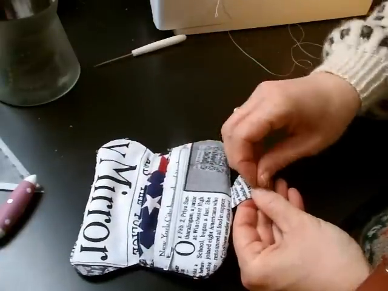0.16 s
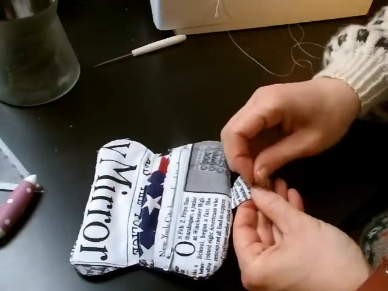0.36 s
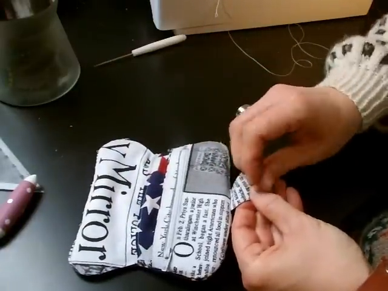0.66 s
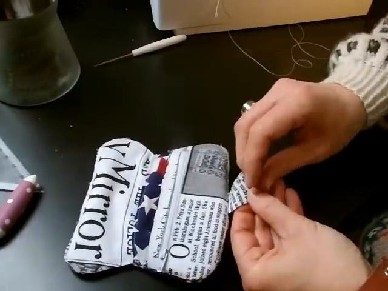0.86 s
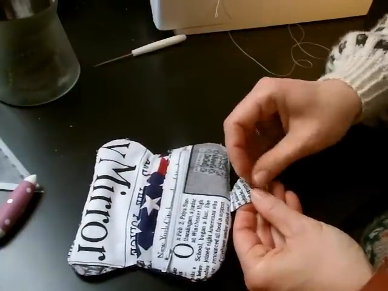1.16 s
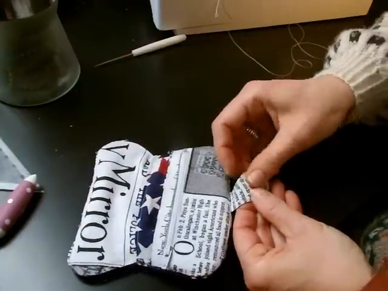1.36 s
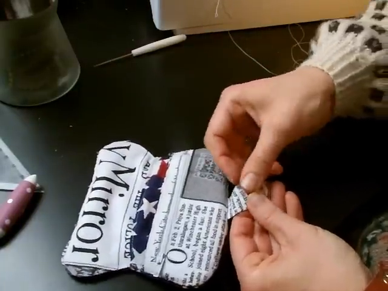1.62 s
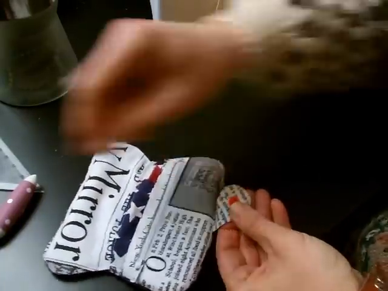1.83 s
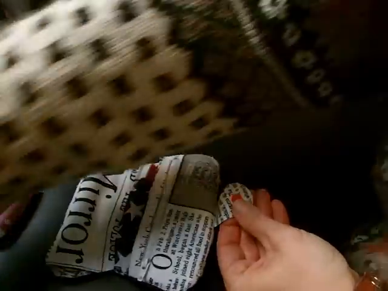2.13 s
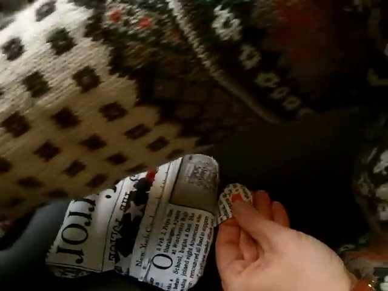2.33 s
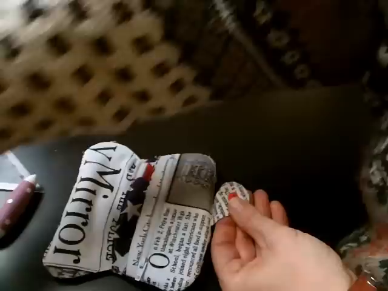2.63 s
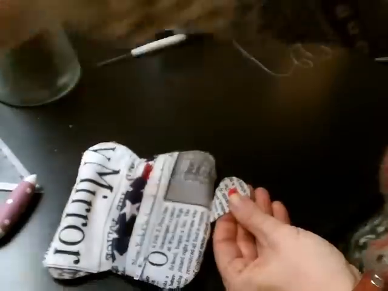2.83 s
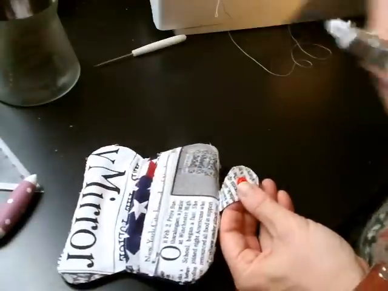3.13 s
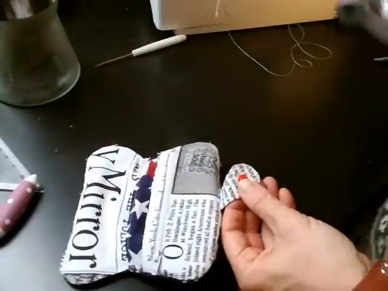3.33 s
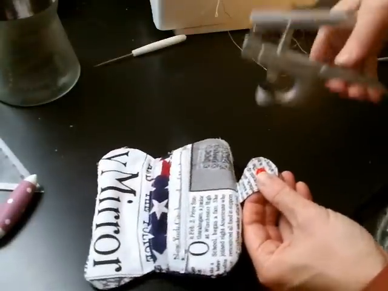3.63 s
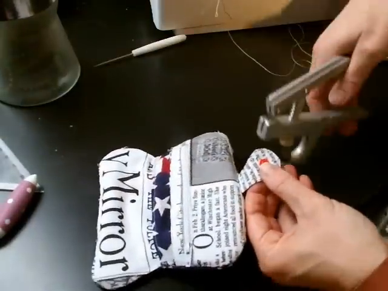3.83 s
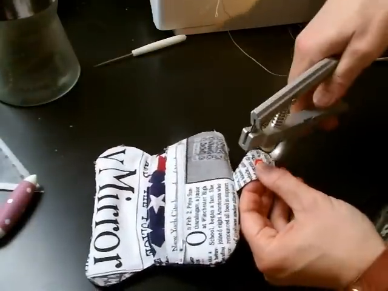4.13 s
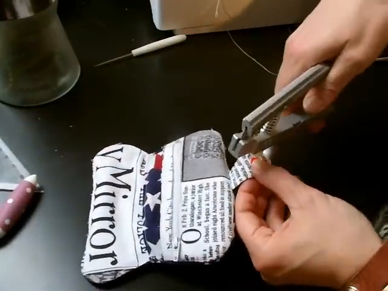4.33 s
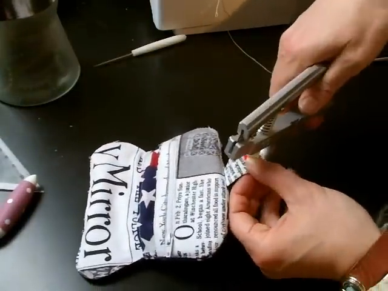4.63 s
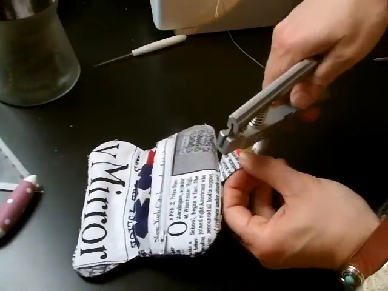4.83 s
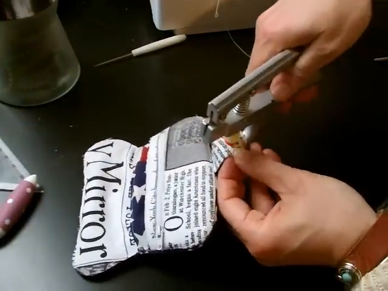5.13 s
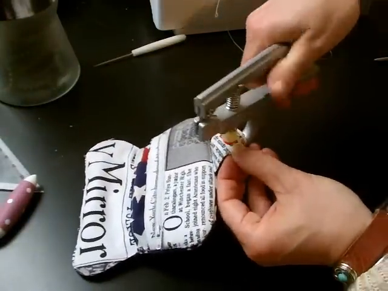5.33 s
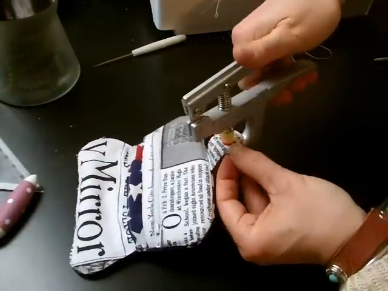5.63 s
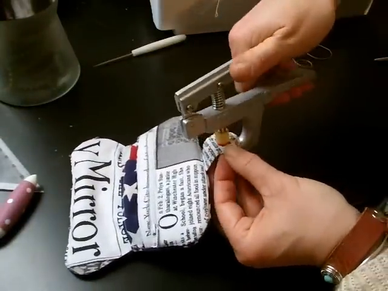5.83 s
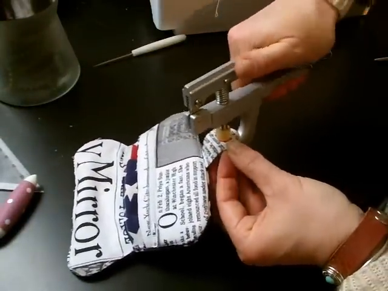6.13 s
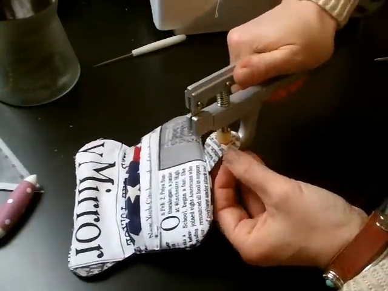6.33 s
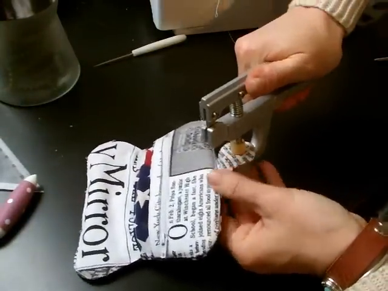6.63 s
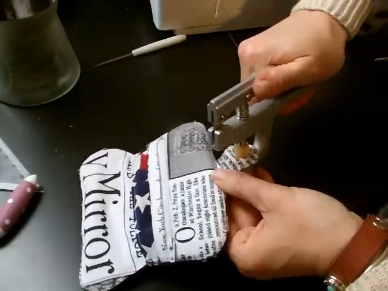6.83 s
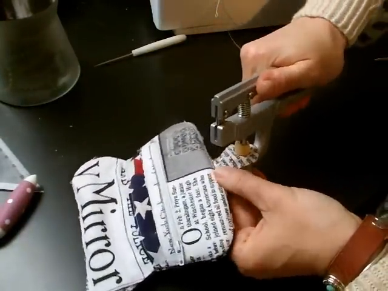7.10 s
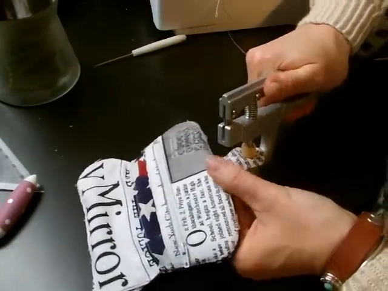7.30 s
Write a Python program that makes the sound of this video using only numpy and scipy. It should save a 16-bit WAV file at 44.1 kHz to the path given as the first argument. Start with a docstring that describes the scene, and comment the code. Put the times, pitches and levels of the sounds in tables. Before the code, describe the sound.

Wool sleeve rustles, metal pliers drag and knock over resonant wood, get lifted with sharp clatter, then small metallic clicks and taps follow quietly.

```python
"""A quiet room with a wooden sewing table, where hands are at work. An arm in a wool sleeve reaches across and
drags metal snap pliers over the table top: knocks and scrapes set the wood ringing. The pliers are lifted
with a clatter and set on a cloth tab with light clicks: bursts of noise and ringing metal. Small taps are
short rings with puffs of noise, and rustling cloth is fine noise. Faint thin cheeps are pure tones, and a
steady hiss of shaped noise lies under everything."""
import sys
import numpy as np
from scipy import signal
from scipy.fft import rfft, irfft
from scipy.io import wavfile

SR = 44100
rng = np.random.default_rng(int(sys.argv[2]) if len(sys.argv) > 2 else 0)


def persist_wave(psi):
    """Save psi, clipped to +-1, as 16-bit WAV."""
    counts = np.round(np.clip(psi, -1, 1) * 32767).astype(np.int16)
    wavfile.write(sys.argv[1], SR, np.atleast_2d(counts).T)


N = 328986


def from_db(db):
    """Turn a level in dB into a gain."""
    return 10 ** (np.asarray(db) / 20)


def rms_one(x):
    """Scale a sound to an average strength (rms) of 1."""
    return x / np.sqrt(np.mean(x ** 2) + 1e-20)


def in_time(rows, column):
    """Read one column of a curve in dB at every sample; -120 dB outside its span."""
    rows = np.array(rows)
    return np.interp(np.arange(N) / SR, rows[:, 0], rows[:, column], left=-120, right=-120)


def at_hz(points, hz):
    """Read a curve over frequency, with straight lines on a logarithmic frequency axis."""
    points = np.array(points)
    return np.interp(np.log(hz), np.log(points[:, 0]), points[:, 1])


def drift(rate_hz):
    """Slow random wandering with a spread of 1: noise smoothed twice, computed at every 40th sample."""
    r = np.exp(-80 * np.pi * rate_hz / SR)
    noise = rng.standard_normal(N // 40 + 2002)
    slow = signal.lfilter([1], [1, -2 * r, r * r], noise)[2000:]  # skip the filter's start
    return np.interp(np.arange(N) / 40, np.arange(len(slow)), rms_one(slow))


def ring(blows, hz, t60):
    """One way of ringing (a mode): a unit blow starts a sine of height 1 that falls 60 dB in t60 seconds."""
    r = from_db(-60 / (t60 * SR))
    w = 2 * np.pi * hz / SR
    return signal.lfilter([0, np.sin(w)], [1, -2 * r * np.cos(w), r * r], blows + 1e-18)


def filtered(x, order, hz, kind):
    """Butterworth filter: keep the low, high or middle part of a sound."""
    return signal.sosfilt(signal.butter(order, hz, kind, fs=SR, output="sos"), x)


def band(x, low_hz, high_hz):
    """Keep the frequencies between two limits."""
    return filtered(x, 2, [low_hz, high_hz], "band")


def impulses(times, gains):
    """One-sample blows of the given heights at the given times."""
    out = np.zeros(N)
    np.add.at(out, np.round(np.asarray(times) * SR).astype(int), gains)
    return out


def grains(per_s, spread_db):
    """Random tiny contacts of uneven size and sign; rms 1."""
    sizes = from_db(spread_db * np.minimum(rng.exponential(1, N), 4))
    signs = rng.choice([-1, 1], N)
    return rms_one(sizes * signs * (rng.random(N) < per_s / SR))


def coloured(source, spectrum):
    """Shape each row of a source to a spectrum; rms 1 over all rows."""
    hz = np.maximum(np.arange(N // 2 + 1) * SR / N, 1)
    return rms_one(irfft(rfft(source) * from_db(at_hz(spectrum, hz)), N))


def leaning(hz, centre_hz, octaves):
    """A blow drives modes near its centre pitch hardest: -6 dB at the given distance in octaves."""
    return -6.0 * (np.log2(hz / centre_hz) / octaves) ** 2


def swell(centre_s, length_s):
    """A smooth bell-shaped rise and fall with a height of 1."""
    return np.exp(-8 * ((np.arange(N) / SR - centre_s) / length_s) ** 2)


def sideways(x, spread_db, above_hz):
    """The treble above a given pitch spreads unevenly to left and right, smeared over about a millisecond."""
    t = np.arange(SR // 200) / SR
    smear = rms_one(rng.standard_normal(len(t)) * from_db(-60 * t / 0.0017)) / np.sqrt(len(t))
    treble = filtered(x, 2, above_hz, "high")
    # the small minus share makes the right louder
    side = from_db(spread_db) * signal.fftconvolve(treble, smear)[:N] - 0.023 * treble
    return x + side * [[1], [-1]]


def hiss():
    """Steady shaped noise; left and right are alike mainly in the deep bass and the treble."""
    # hiss colour: (frequency [Hz], relative level per Hz [dB])
    hiss_colour = [(25, -42), (45, -37), (75, -4), (120, -15), (300, -2), (600, 0.5), (1000, -2),
                   (2000, -0.5), (3500, -1), (8000, -6.5), (12000, -7), (15700, -4.5)]
    # how alike left and right are: (frequency [Hz], likeness [0 to 1])
    likeness = [(60, 0.81), (150, 0.19), (380, 0.13), (950, 0.25), (3500, 0.022), (5000, 0.82),
                (15000, 0.78)]
    level_db = -44
    hz = np.maximum(np.arange(N // 2 + 1) * SR / N, 1)
    alike = np.clip(at_hz(likeness, hz), 0, 1)
    mid, side = rfft(rng.standard_normal((2, N)))
    pair = irfft(np.sqrt(1 + alike) * mid + np.sqrt(1 - alike) * side * [[1], [-1]], N)
    return from_db(level_db + 0.2 * drift(2.9)) * coloured(pair, hiss_colour)


def cheeps():
    """Faint thin cheeps: short pure tones that swell and fade."""
    # cheeps: centre time [s]
    centres = [.535, 1.132, 1.372, 7.034, 7.27]
    level_db, pitch_hz, length_s = -49.5, 2880, 0.046
    tone = np.sin(2 * np.pi * pitch_hz * np.arange(N) / SR)
    return from_db(level_db) * tone * sum(swell(s, length_s) for s in centres)


def rustle():
    """Fibres catch and let go: dense fine grains for bright wool, smooth noise for dull cotton."""
    # arm motion, heard as the wool sleeve rubbing: (time [s], level [dB])
    arm_motion = [(0.0, -49.5), (1.25, -48), (1.81, -43), (2.3, -39), (2.78, -41), (3.05, -48),
                  (3.45, -46.5), (7.46, -47)]
    # brief brushes of cloth against cloth or metal: (centre time [s], length [s], level [dB])
    brushes = [(0.114, 0.076, -51), (0.705, 0.13, -53), (1.287, 0.13, -49), (1.475, .06, -48),
               (1.73, .045, -50), (2.912, 0.1, -43), (3.01, 0.11, -40.5), (3.214, 0.2, -36),
               (3.378, 0.057, -48), (5.106, 0.071, -41), (5.33, .05, -51), (5.586, 0.049, -44)]
    # wool colour: (frequency [Hz], relative level per Hz [dB])
    wool_colour = [(2500, -11.5), (4000, -9), (6500, -6.5), (8200, -3.5), (9500, -2), (10800, -3.5),
                   (12500, -7), (15700, -7.5)]
    # cotton colour: (frequency [Hz], relative level per Hz [dB])
    cotton_colour = [(200, -21), (500, -0.5), (1200, 2), (2500, -2.5), (4500, -22.5)]
    cotton_rest_db, cotton_follows = -51.5, 0.41  # cotton pouch: level at rest, share of the arm's swing
    arm_db = in_time(arm_motion, 1)
    rubbing = from_db(arm_db) + sum(from_db(db) * swell(s, length) for s, length, db in brushes)
    wool = coloured(grains(per_s=14000, spread_db=1.5), wool_colour) * rubbing * from_db(1.2 * drift(23))
    cotton_db = cotton_rest_db + cotton_follows * (arm_db - arm_db[-1])
    cotton = coloured(rng.standard_normal((2, N)), cotton_colour) * from_db(cotton_db + 2.1 * drift(29))
    return sideways(wool, spread_db=-30, above_hz=1800) + cotton


def taps():
    """Each tap or thud is a brief ring at its pitch with a dying puff of noise around it."""
    # small dull taps of studs, nails and jaws: (time [s], relative level [dB], pitch [Hz])
    small_taps = [(0.115, -43.5, 2790), (0.249, -41.5, 2210), (0.709, -44, 1680), (0.884, -39.5, 2480),
                  (1.018, -37.5, 2410), (1.123, -46, 2780), (1.28, -40.5, 1370), (1.784, -35, 2350),
                  (1.918, -36.5, 2400), (2.998, -41, 2660), (3.719, -45, 2720), (3.853, -47, 2110),
                  (4.0833, -31.5, 1350), (4.381, -35, 1550), (4.453, -41, 2690), (4.686, -37.5, 1400),
                  (4.858, -45, 1340), (5.089, -38.5, 3000), (5.121, -37, 2630), (5.321, -42.5, 2000),
                  (5.953, -41, 2680), (6.154, -45, 1920), (6.755, -43.5, 2720), (6.889, -44.5, 1940),
                  (7.43, -44, 3500)]
    # wrist on the table: (time [s], relative level [dB], pitch [Hz])
    thuds = [(2.34, -52.5, 80), (2.565, -55, 75), (3.045, -41, 480), (3.149, -45, 368), (5.585, -43, 510),
             (6.706, -46.5, 167)]
    # a thud's puff falls 60 dB in 17 cycles of its pitch, a tap's in 0.052 s
    hits = [(s, db, hz, 0.052) for s, db, hz in small_taps]
    hits += [(s, db, hz, 17 / hz) for s, db, hz in thuds]
    ring_cycles, ring_db = 39, 3  # cycles for the ring to fall 60 dB, its starting level
    out, t = np.zeros(N), np.arange(SR // 6) / SR
    for s, level_db, hz, t60 in hits:
        i = round(s * SR)
        ring_t60 = min(ring_cycles / hz, t60)
        noise = rms_one(band(rng.standard_normal(len(t)), 0.68 * hz, 1.26 * hz))
        puff = from_db(-60 * t / t60) * noise
        tone = from_db(ring_db - 60 * t / ring_t60) * np.sin(2 * np.pi * hz * t)
        out[i:i + len(t)] += (from_db(level_db) * (puff + tone))[:N - i]
    return out


def pliers():
    """Each click is a noisy snap and a dying rattle, with modes of jaws, spring and handle ringing along."""
    # metal parts click: (time [s], relative strength [dB], handle ring relative to the click [dB],
    # colour centre [Hz], time for the snap to fall 60 dB [s])
    clicks = [(1.795, -29, -30, 9500, .03), (2.562, -17, -42, 9300, 0.038), (2.695, 1.5, -45, 11400, 0.013),
              (2.6993, 0.5, -48, 10500, 0.037), (2.72, -15, -33, 9500, 0.069),
              (3.049, -2.5, -28, 6300, 0.012), (3.1663, -5, -28, 8800, 0.015),
              (3.177, -14.5, -26, 5300, .04), (3.187, -23, -36, 5500, 0.043),
              (3.196, -21, -30, 4000, 0.034), (3.2168, -16, -38, 5000, 0.037), (3.212, -14, -38, 9500, .05),
              (3.225, -12.5, -13, 6800, 0.027), (3.2348, -11, -42, 12000, .02),
              (3.24, -13, -22, 9800, 0.026), (3.269, -1, -27.5, 8900, .016), (4.083, -20, -29, 8100, 0.016),
              (4.382, -17.5, -25, 7000, 0.026), (4.6857, -20.5, -28, 8650, 0.043),
              (5.816, -26, -36, 9050, .03), (6.0828, -11.5, -40, 8200, 0.02),
              (6.096, -9.5, -49, 9050, 0.024), (6.099, -13, -45, 9400, 0.052),
              (6.1594, -23, -32, 11000, .01), (6.185, -15, -39, 6240, 0.0097),
              (6.1871, -16.5, -35, 8060, 0.027), (6.2064, -28, -28, 7000, .02),
              (6.346, -27, -31, 7900, 0.023), (7.43, -31, -27, 8000, 0.036)]
    # modes of jaws and spring: (frequency [Hz], relative level [dB], time to fall 60 dB [s])
    jaw_modes = [(4200, -44, .015), (4540, -3.5, 0.011), (5400, -2, 0.014), (6740, -7, 0.044),
                 (7460, -35, 0.0098), (8250, -9, 0.019), (9020, 0.5, 0.013), (9670, -3.5, 0.015),
                 (10640, -2, 0.02), (11690, -10, 0.0054), (12800, -13, 0.022)]
    # modes of the handle: (frequency [Hz], relative level [dB], time to fall 60 dB [s])
    handle_modes = [(2745, -1, .11), (2660, -8, .06), (2320, -6, .05), (1950, -12, .02)]
    crack_db, jaws_db, wide_share = -12.5, -31, 0.74  # wide_share: broad part of the crack
    rattle_t60_s, rattle_db, rattle_hz = 0.19, -9, 9600  # loose parts rattle on after the snap
    grip_detune = 0.015  # the hand holds the pliers differently each time, shifting modes by about this share
    out, handle, t = np.zeros(N), np.zeros(N), np.arange(SR // 5) / SR
    for s, strength_db, ring_db, centre_hz, t60 in clicks:
        i = round(s * SR)
        uneven = np.minimum(rng.exponential(1, len(t)), 2)
        chatter = from_db(strength_db) * rms_one(rng.standard_normal(len(t)) * uneven)
        snap = chatter * from_db(-60 * t / max(t60, 0.004))
        snap[0] = 4.8 * from_db(strength_db)  # the sharp first contact
        rattle = chatter * from_db(rattle_db - 60 * t / rattle_t60_s)
        handle[i] += from_db(strength_db + ring_db)
        jaws = np.zeros(len(t))
        for hz, db, ring_s in jaw_modes:
            gain = from_db(db + rng.normal(0, 1.9) + leaning(hz, centre_hz, 0.54))
            jaws += gain * ring(snap, hz * rng.normal(1, grip_detune), ring_s)
        crack = band(snap, 0.68 * centre_hz, min(1.12 * centre_hz, 16000))
        crack += wide_share * band(snap, 2050, 13700)
        crack += band(rattle, 0.73 * rattle_hz, 1.03 * rattle_hz) + 0.42 * band(rattle, 1500, 7500)
        out[i:i + len(t)] += (from_db(crack_db) * crack + from_db(jaws_db) * jaws)[:N - i]
    return out + sum(from_db(db) * ring(handle, hz, t60) for hz, db, t60 in handle_modes)


def table_top():
    """Knocks, their bounces and the drag's stick-slip set the same dense modes of the wood ringing."""
    # pliers knock on the table top: (time [s], relative strength [dB], pitch centre [Hz],
    # crack relative to the knock [dB])
    knocks = [(2.2323, -19, 880, -8.5), (2.236, -12.5, 990, -17), (2.243, -10, 610, -43),
              (2.3359, -12, 895, -5.5), (2.342, -0.5, 990, -21), (2.317, -21, 700, -30),
              (2.373, -17, 660, -17), (2.42, -16, 900, -24), (2.4414, 0, 1100, -21.5),
              (2.514, -12, 826, -34), (2.5623, -6.5, 915, -5.5), (2.568, -4.5, 594, -32),
              (2.613, -13, 695, -14), (2.649, -17.5, 1390, -9), (2.657, -7.5, 1730, -7)]
    # pliers dragged over the wood: (time [s], rumble level [dB], grit level [dB])
    drag = [(2.23, -27, -43), (2.31, -39.5, -50), (2.36, -18.5, -35), (2.41, -40.5, -51), (2.49, -24, -45),
            (2.535, -27, -35), (2.555, -38, -39), (2.6, -24.5, -43), (2.66, -22.5, -30), (2.695, -42, -30),
            (2.75, -63, -47)]
    # modes of the table top: (frequency [Hz], relative level [dB], time to fall 60 dB [s])
    wood_modes = [(180, -27, 0.03), (232, -6.5, 0.081), (263, -19, 0.064), (305, -23, 0.043),
                  (322, -0.5, 0.11), (394, -24, 0.07), (454, -21, 0.072), (486, -1, 0.027), (584, 2, 0.048),
                  (647, 5, 0.057), (700, -10.5, 0.24), (850, 2.5, 0.08), (945, 2.5, 0.058),
                  (1100, 0.5, 0.049), (1155, 5, 0.037), (1252, -5, 0.14), (1320, -6.5, 0.076),
                  (1450, -7, 0.12), (1690, -14, 0.18), (1860, -12, 0.085), (2165, 9, 0.011),
                  (2620, -15, 0.018), (2750, -10, 0.026)]
    # each knock bounces twice, every 10.5 ms: weaker, lower and with less crack
    blows = [(s + k * 0.0105, db - k * 6, hz * 0.9 ** k, crack - k * 5)
             for s, db, hz, crack in knocks for k in range(3)]
    s, strength_db, centre_hz, crack_db = np.transpose(blows)
    # rms of all modes together under a steady scrape of rms 1
    steady = np.sqrt(sum(from_db(db) ** 2 * t60 * SR / (4 * np.log(1000)) for hz, db, t60 in wood_modes))
    slips = from_db(in_time(drag, 1)) / steady
    scrapes = [grains(per_s=770, spread_db=6.0) for k in range(3)]
    out = np.zeros(N)
    for k, (hz, level_db, t60) in enumerate(wood_modes):
        uneven_db = rng.normal(0, 4.26, len(s))
        push = from_db(strength_db + leaning(hz, centre_hz, 0.7) + uneven_db) / np.sqrt(len(wood_modes))
        struck = impulses(s, push * rng.choice([-1, 1], len(s)))
        out += from_db(level_db) * ring(struck + slips * scrapes[k % 3], hz, t60)
    # the spot that is struck thumps at the knock's own pitch, falling 60 dB in 9 cycles
    t = np.arange(SR // 20) / SR
    for i, db, hz in zip(np.round(s * SR).astype(int), strength_db, centre_hz):
        out[i:i + len(t)] += from_db(db - 4.5 - 60 * t * hz / 9.0) * np.sin(2 * np.pi * hz * t)
    # a hard edge adds a short crack of decaying noise
    crack_t60_s, treble_db = 0.036, -9.5
    edges = impulses(s, from_db(strength_db + crack_db))
    decay = signal.lfilter([1], [1, -from_db(-60 / (crack_t60_s * SR))], edges)
    noise = rng.standard_normal(N)
    treble = from_db(treble_db) * rms_one(band(noise, 4400, 9200))
    crack = decay * (rms_one(band(noise, 1020, 2320)) + treble)
    grit = from_db(in_time(drag, 2)) * rms_one(band(grains(per_s=3100, spread_db=4.0), 890, 6200))
    body = filtered(out, 8, 180, "high")  # a small top radiates no deep bass
    return body + crack + grit


def room(x, level_db):
    """Near surfaces return a short dull tail, different in left and right."""
    t60_s, wall_cut_hz = 0.057, 6900
    t = np.arange(SR // 4) / SR
    tail = rng.standard_normal((2, len(t))) * from_db(-60 * t / t60_s) * (t > 0.001)
    tail = filtered(tail, 1, wall_cut_hz, "low")
    tail = tail / np.sqrt(np.sum(tail ** 2, axis=1, keepdims=True))
    return from_db(level_db) * signal.fftconvolve(x[None], tail)[:, :N]


def scene():
    """Add the steady layers, the contacts near the centre and their room tails."""
    steady_cut = signal.ellip(12, 0.5, 60, 15700, fs=SR, output="sos")  # low-pass [Hz]
    steady = signal.sosfilt(steady_cut, hiss() + rustle())
    wood = taps() + table_top()
    metal = band(pliers(), 770, 15000)
    near = wood + sideways(metal, spread_db=0.5, above_hz=13500) + cheeps()
    return near + room(wood, level_db=-28) + room(metal, level_db=-12) + steady


def record(dry):
    """Round off the peaks softly, then cut the top treble."""
    rounded = 1.1 * np.tanh(dry / 1.1)
    cutoff_hz = 16700
    return signal.sosfilt(signal.cheby2(12, 70, cutoff_hz, fs=SR, output="sos"), rounded)


dry = scene()
out = record(dry)
persist_wave(out)
```